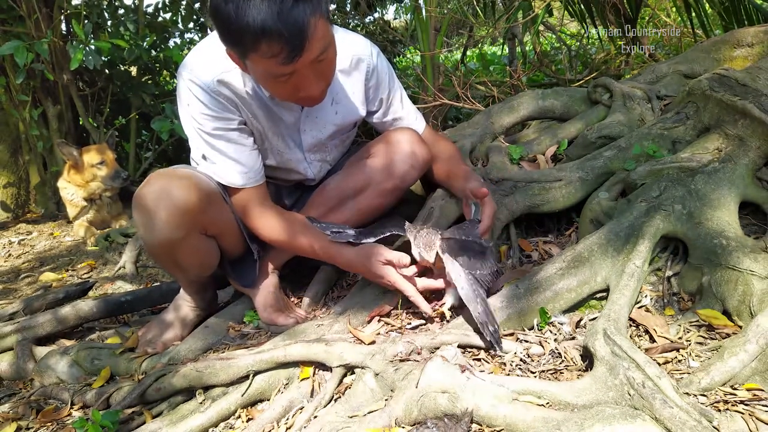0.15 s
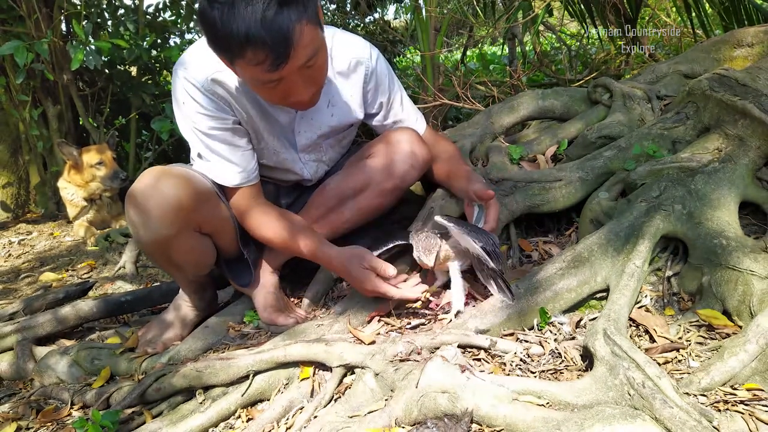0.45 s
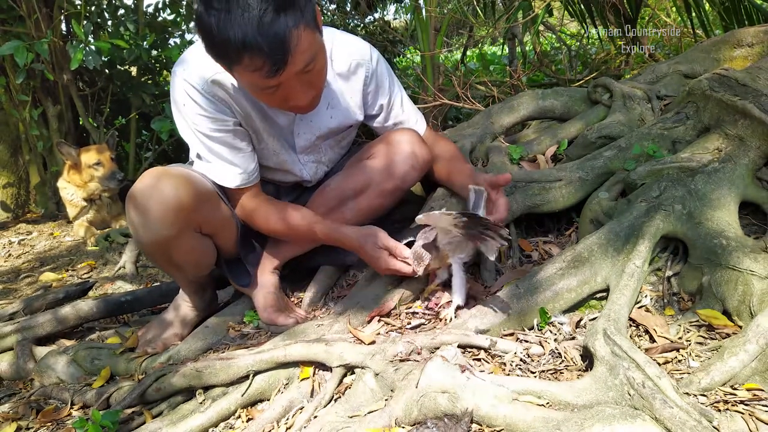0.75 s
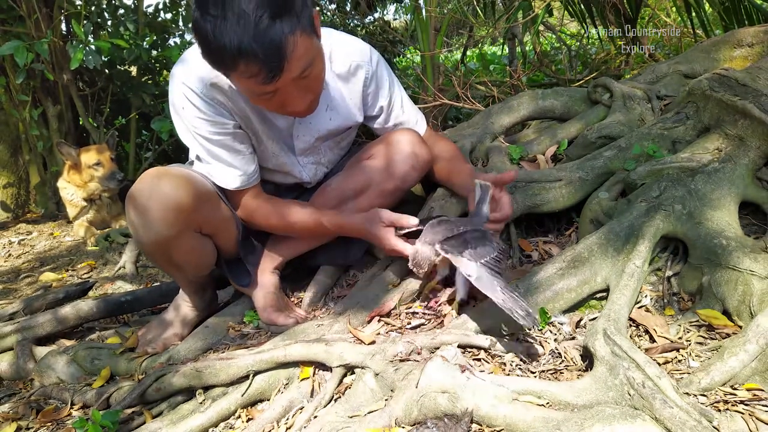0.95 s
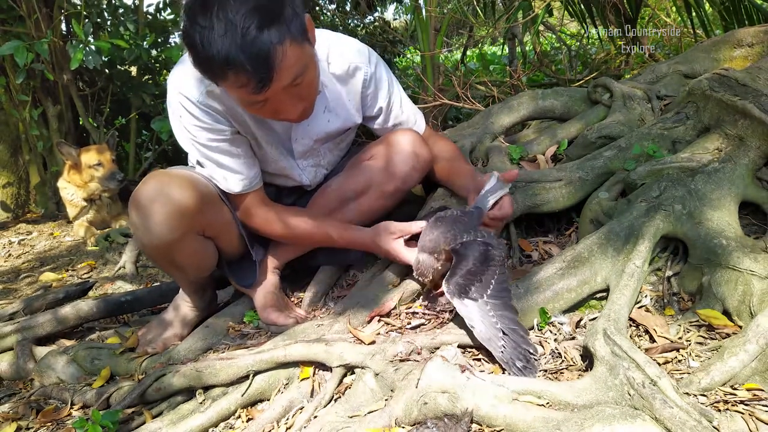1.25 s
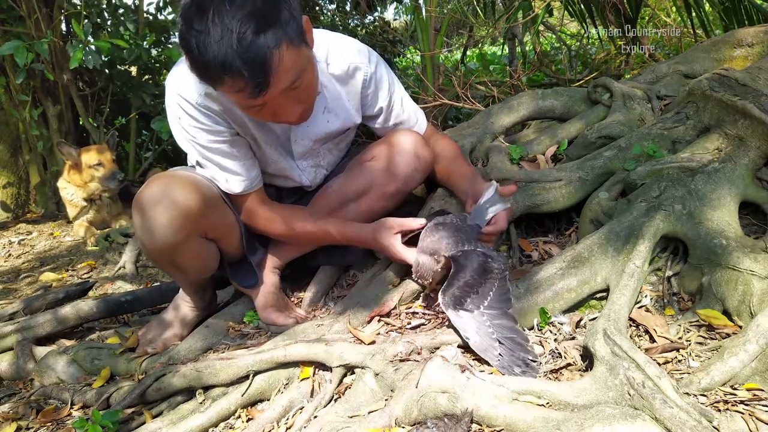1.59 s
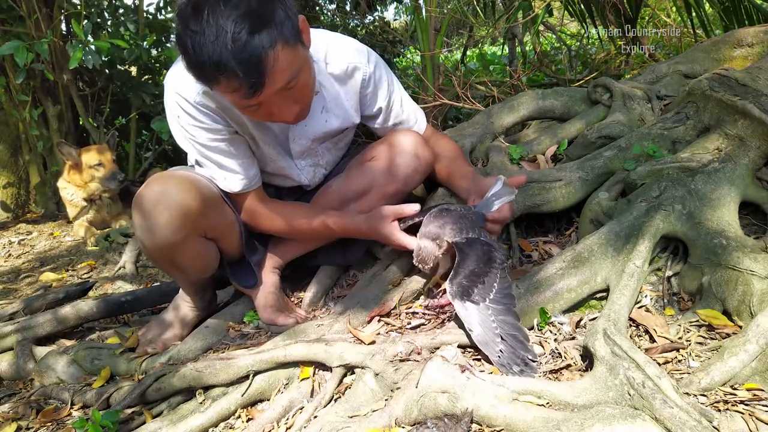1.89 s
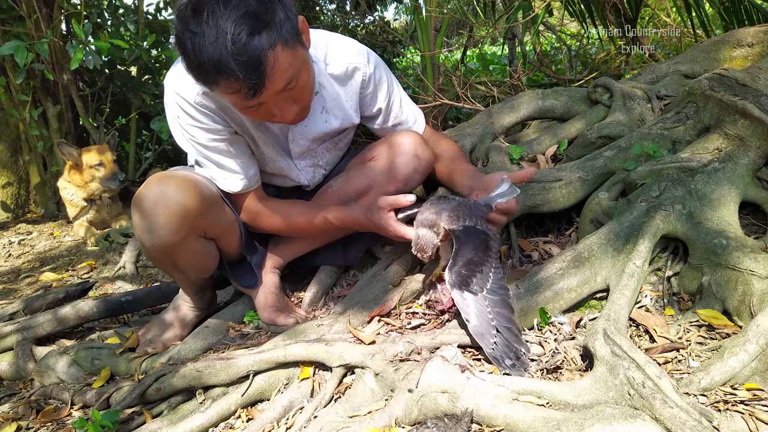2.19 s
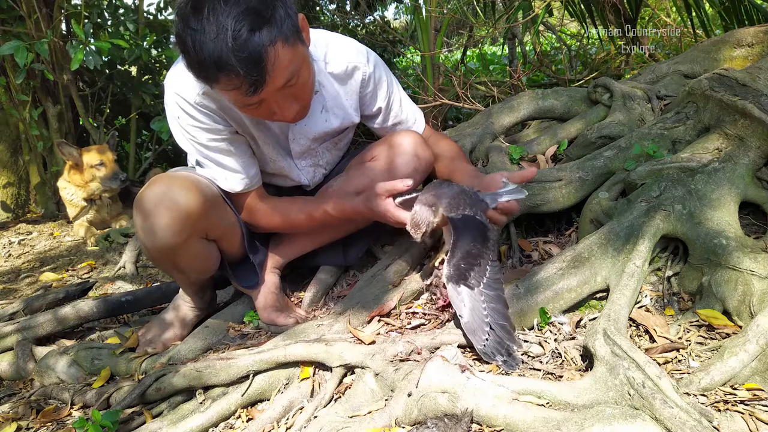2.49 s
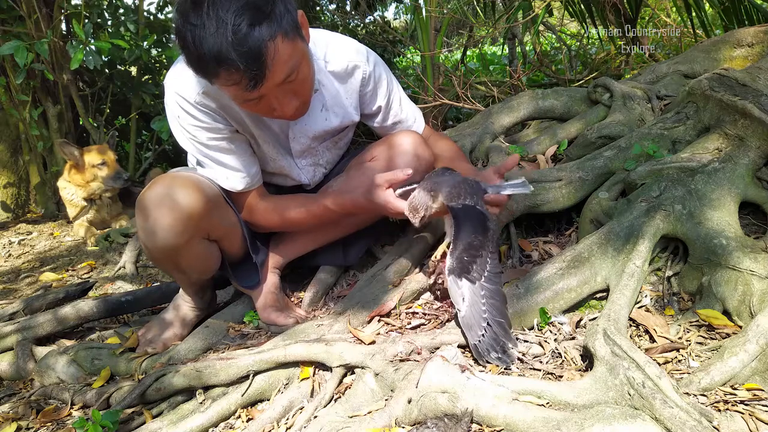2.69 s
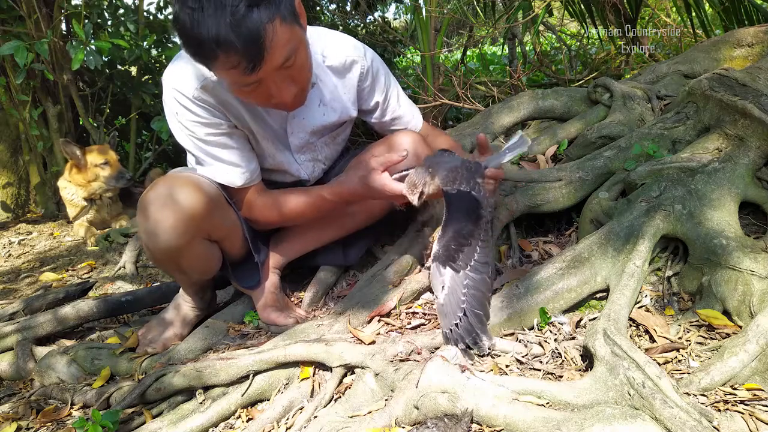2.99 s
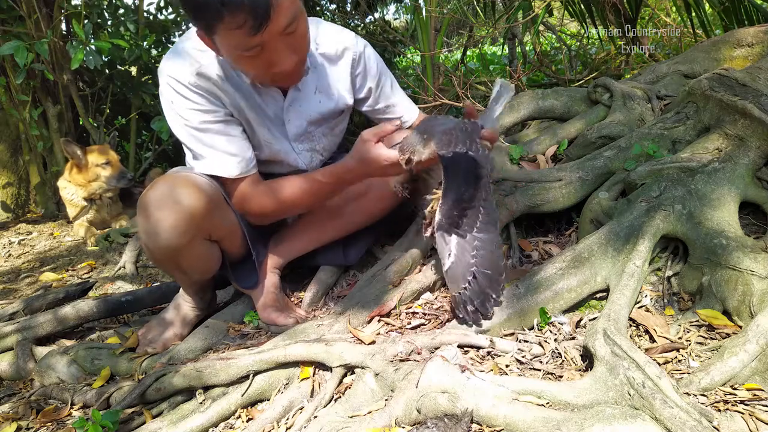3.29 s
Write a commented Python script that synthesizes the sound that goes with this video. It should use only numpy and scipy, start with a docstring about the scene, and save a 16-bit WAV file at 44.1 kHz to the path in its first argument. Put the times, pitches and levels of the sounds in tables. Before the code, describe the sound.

Young bird of prey gives two long, thin, hoarse whistled screeches outdoors, starting a third

```python
"""A young kite, held by hand under trees, gives two long begging screeches and starts a third.
The long ones open with a tiny croak, slide into thin whistles and hiss, and fall away in a creak.
Whistles are gliding sines, croaks and creaks harmonic sums; noise makes the hoarse tones and hiss.
Filtered noise also makes the wind and handling rumble, quiet air, faint rustles and a high sizzle.
Two distant drones are wavering narrow bands; a short diffuse echo surrounds the bird."""
import sys
import numpy as np
from scipy import signal
from scipy.fft import rfft, irfft, next_fast_len
from scipy.io import wavfile

SR = 44100
rng = np.random.default_rng(int(sys.argv[2]) if len(sys.argv) > 2 else 0)


def generate_wav(signal):
    """Clip the signal to [-1, 1] and save it as 16-bit WAV at the path in sys.argv[1]."""
    frames = np.transpose(np.atleast_2d(signal))
    scaled = np.clip(frames, -1, 1) * 32767
    pcm = np.round(scaled).astype(np.int16)
    wavfile.write(sys.argv[1], SR, pcm)


N = 152145  # samples
T = np.arange(N) / SR
CUTOFF_HZ = 15700


def from_db(db):
    """Level law: twenty decibels are a tenfold amplitude."""
    return 10 ** (np.asarray(db) / 20)


def rms_one(x):
    """Power normalisation: scale to unit mean square."""
    return x / np.sqrt(np.mean(np.abs(x) ** 2) + 1e-20)


def in_time(rows):
    """Linear interpolation: each column of a curve at every sample."""
    s, *columns = np.transpose(rows)
    return [np.interp(T, s, c) for c in columns]


def at_hz(points, hz):
    """Logarithmic frequency scale: read a spectrum between its points."""
    f, value = np.transpose(points)
    return np.interp(np.log(np.maximum(hz, 1)), np.log(f), value)


def gate(start, end, fade):
    """Amplitude envelope: up to one between two times, with edges sloping for fade seconds."""
    return np.clip(np.minimum(T - start, end - T) / fade, 0, 1)


def drift(rate):
    """Random modulation: white noise through a two-pole low-pass at rate Hz, with unit power."""
    r = np.exp(-2 * np.pi * rate / SR)
    white = rng.standard_normal(N + SR)
    settled = signal.lfilter([1], [1, -2 * r, r * r], white)[SR:]
    return rms_one(settled)


def noise(colour, width=None):
    """Spectral shaping: noise rolled off outside its colour; stereo if given side-to-mid levels."""
    size = next_fast_len(N)
    hz = np.fft.rfftfreq(size, 1 / SR)
    above, below = hz / colour[-1][0], colour[0][0] / (hz + 1)
    outside = np.maximum(np.maximum(above, below), 1)
    gain = from_db(at_hz(colour, hz)) / outside ** 6
    mid, side = rfft(rng.standard_normal((2, size))) * gain
    if width is not None:
        mid = mid + side * from_db(at_hz(width, hz)) * [[1], [-1]]
    return rms_one(irfft(mid, size)[..., :N])


def phase_of(hz):
    """Phase accumulation: the running integral of a pitch curve, in radians."""
    return 2 * np.pi * np.cumsum(hz) / SR


def narrow_band(hz, width):
    """Resonance stirred by noise: two random amplitudes in quadrature make a wavering tone."""
    phase = phase_of(hz)
    return drift(width / 2) * np.sin(phase) + drift(width / 2) * np.cos(phase)


# gliding whistles of the screeches; columns: time_s, pitch_hz, level_db
WHISTLES = [
    [(.22, 3027, -44), (.242, 3138, -35.5), (.305, 3202, -32), (.36, 3330, -36.5), (.42, 3390, -39.5),
     (.47, 3414, -42), (.525, 3468, -39), (.6, 3676, -36), (.616, 3530, -29), (.655, 3573, -28),
     (.7, 3723, -30), (.745, 3740, -32.5), (.83, 4110, -35), (.852, 4130, -38), (.882, 4380, -36),
     (.9, 4210, -40)],
    [(.89, 3950, -43), (.912, 3744, -32), (.944, 3612, -33), (.968, 3590, -49), (.99, 3580, -30),
     (1.025, 3740, -30), (1.04, 3760, -22.5), (1.095, 3718, -28), (1.116, 3660, -29), (1.14, 3730, -38),
     (1.18, 3910, -41.5), (1.2, 4034, -62)],
    [(1.18, 4220, -47), (1.226, 4400, -37), (1.26, 4400, -33.5), (1.325, 4415, -31), (1.35, 4286, -35.5),
     (1.364, 4400, -32), (1.378, 4273, -35.5), (1.412, 4020, -51)],
    [(1.888, 2990, -50), (1.91, 3066, -44), (1.945, 3145, -38.5), (1.985, 3260, -39.5), (2.03, 3292, -35),
     (2.08, 3455, -38), (2.11, 3487, -39), (2.145, 3378, -34), (2.195, 3490, -38), (2.22, 3650, -45),
     (2.275, 3800, -50)],
    [(2.72, 3900, -43), (2.758, 3764, -38.5), (2.778, 3664, -29.5), (2.794, 3595, -34), (2.806, 3523, -28),
     (2.812, 3460, -48), (2.824, 3570, -39), (2.83, 3450, -50)],
]
# second harmonic of each whistle, relative to its fundamental; column: level_db
OCTAVE_DB = [-57, -53, -48, -28, -37]
WHISTLE_JITTER, WHISTLE_FLUTTER_DB = 0.0035, 0.2  # rms pitch share, rms level


def whistles():
    """Nearly sinusoidal oscillation: a slightly unsteady tone with a faint second harmonic."""
    out = 0
    waver = WHISTLE_JITTER * drift(155)
    flutter = WHISTLE_FLUTTER_DB * drift(54)
    for rows, octave_db in zip(WHISTLES, OCTAVE_DB):
        hz, db = in_time(rows)
        phase = phase_of(hz * (1 + waver))
        tone = np.sin(phase) + from_db(octave_db) * np.sin(2 * phase)
        level = gate(rows[0][0], rows[-1][0], 0.0037) * from_db(db + flutter)
        out = out + level * tone
    return np.sqrt(2) * out  # levels are rms of the fundamental


# throat colour, weighting harmonics against each other; columns: frequency_hz, gain_db
THROAT = [(550, -2), (820, 1.5), (1150, 4), (1700, -1), (2500, 2), (3200, 0), (3900, -18.5), (4600, -8.5),
          (5700, -7), (7500, -45), (15000, -38)]


def buzz(hz, level, tilt_db, top_hz):
    """Source and filter: harmonics of the syrinx, coloured by the throat, held to an rms level."""
    on = level > 0
    k = np.arange(1, 15)[:, None]  # harmonic numbers
    partials = k * hz[on]
    gains = from_db(at_hz(THROAT, partials) + tilt_db * np.log2(k))
    gains = gains * (partials < CUTOFF_HZ) / (1 + (partials / top_hz) ** 8)
    pulses = (gains * np.sin(k * (phase_of(hz[on]) + np.pi))).sum(0)
    out = np.zeros(N)
    out[on] = pulses / np.sqrt((gains ** 2).sum(0) / 2)
    return out * level


# the call sliding into and out of a screech; columns: time_s, pitch_hz, level_db
CREAKS = [
    [(.139, 1384, -51), (.15, 1574, -42), (.155, 1583, -33.5), (.16, 1654, -35.5), (.165, 1728, -40.5),
     (.177, 1806, -43), (.185, 2200, -45.5), (.215, 2500, -49), (.28, 2900, -56)],
    [(1.378, 3563, -34), (1.388, 3320, -27.5), (1.396, 2867, -43), (1.401, 1890, -46.5),
     (1.408, 1520, -42.5), (1.416, 1157, -49), (1.421, 804, -39.5), (1.428, 650, -51)],
    [(1.861, 1790, -56), (1.88, 1863, -60), (1.885, 2490, -51), (1.896, 3020, -50)],
    [(2.812, 2710, -37), (2.818, 2255, -42), (2.826, 1286, -28), (2.834, 1047, -32), (2.837, 815, -37.5),
     (2.843, 790, -33.5), (2.848, 645, -38), (2.853, 602, -32.5), (2.858, 560, -46)],
    [(3.325, 1160, -30), (3.329, 1243, -42.5), (3.333, 1560, -38), (3.339, 1585, -42), (3.344, 1864, -38.5),
     (3.365, 2150, -44.5), (3.395, 2500, -43.5), (3.41, 2917, -41.5), (3.426, 2780, -46),
     (3.43, 2930, -32.5), (3.437, 2865, -52), (3.455, 2710, -27)],
]
# tone of each slide; columns: tilt_db_per_octave, top_edge_hz, rms_jitter_share
CREAK_TONE = [(2.5, 3500, 0.012), (-2, 6300, 0.015), (4, 3600, .04), (0.5, 17000, 0.013),
              (-4.5, 6400, 0.0223)]
CREAK_FLUTTER_DB = 2.25  # rms


def creaks():
    """Rapid random modulation: jitter and flutter roughen the slides at both ends of a screech."""
    out = 0
    waver = drift(285)
    flutter = CREAK_FLUTTER_DB * drift(440)
    for rows, (tilt_db, top_hz, jitter) in zip(CREAKS, CREAK_TONE):
        hz, db = in_time(rows)
        level = gate(rows[0][0], rows[-1][0], 0.0016) * from_db(db + flutter)
        out = out + buzz(hz * (1 + jitter * waver), level, tilt_db, top_hz)
    return out


# croaks as the bill opens; columns: start_s, length_s, pitch_hz, level_db, tilt_db_per_octave
CROAKS = [(0.1315, 0.0063, 592, -38.5, -1.5), (1.8402, 0.0078, 628, -41.5, -10),
          (3.3112, 0.0067, 576, -36.5, -1.5)]


def croaks():
    """Harmonic pulse train: a few cycles at steady pitch before each screech."""
    out = 0
    for s, length, hz, db, tilt_db in CROAKS:
        level = gate(s, s + length, 0.0015) * from_db(db)
        out = out + buzz(np.full(N, hz), level, tilt_db, top_hz=4500)
    return out


# hoarse side tones and airy overtones
# columns: start_s, end_s, start_pitch_hz, end_pitch_hz, level_db, width_hz
SIDE_TONES = [(0.148, 0.426, 1754, 1855, -55.5, 131), (0.134, 0.23, 3150, 3100, -49.5, 120),
              (.23, 0.431, 3126, 3274, -40, 90), (0.388, 0.615, 3080, 3193, -43, 70),
              (0.444, 0.638, 3530, 3770, -50, 200), (0.604, 0.903, 3200, 3000, -54.5, 100),
              (.78, 1.126, 2410, 2746, -49, 140), (1.101, 1.381, 2696, 2982, -45, 131),
              (1.261, 1.407, 3560, 3425, -39, 101), (2.074, 2.254, 4230, 4400, -57.5, 140),
              (2.268, 2.434, 4050, 4330, -44.5, 260), (2.287, 2.589, 3330, 3270, -45, 100),
              (2.356, 2.503, 2384, 2516, -49, 90), (2.374, 2.499, 4806, 4700, -45, 200.3),
              (2.54, 2.75, 2806, 2865, -47, 70), (2.55, 2.716, 3740, 3850, -45.5, 140),
              (2.639, 2.725, 4554, 4630, -38.5, 150), (2.618, 2.856, 6180, 6500, -57, 700),
              (2.768, 2.878, 1270, 1140, -51, 300), (3.313, 3.39, 3146, 3070, -48, 110),
              (3.341, 3.47, 1790, 1860, -51.5, 200), (0.463, .71, 10780, 10630, -59.5, 450),
              (.7, 1.062, 11400, 10740, -69, 600), (1.08, 1.418, 10600, 9840, -67, 600)]


def side_tones():
    """Noise-driven resonance: air stirs narrow bands that never settle into a clean whistle."""
    out = 0
    for start, end, start_hz, end_hz, db, width in SIDE_TONES:
        hz = np.interp(T, [start, end], [start_hz, end_hz])
        out = out + gate(start, end, 0.034) * from_db(db) * narrow_band(hz, width)
    return out


# screech hiss in three registers; columns: time_s, level_db
LOW_HISS = [(.13, -70), (.2, -48.5), (.55, -48.5), (.75, -51), (.95, -49), (1.2, -54), (1.39, -67),
            (1.45, -77), (1.88, -64), (1.96, -56.5), (2.1, -49.5), (2.45, -49.5), (2.8, -47.5), (2.85, -35),
            (2.87, -88)]
HIGH_HISS = [(.4, -66), (.5, -49.5), (.58, -48), (.68, -45), (.86, -41), (1, -42.5), (1.2, -39.5),
             (1.3, -48), (1.38, -42.5), (1.42, -45), (1.45, -60.5), (2.08, -69.5), (2.18, -56),
             (2.28, -49.5), (2.42, -41), (2.53, -41), (2.7, -40.5), (2.85, -38.5), (2.865, -63)]
TOP_HISS = [(.3, -80), (.48, -57), (.62, -53), (.74, -61.5), (.88, -60), (1.05, -62.5), (1.25, -58),
            (1.42, -61.5), (1.5, -92), (2.2, -73), (2.42, -61), (2.84, -57.5), (2.88, -70)]
# colours before and after SECOND_CALL_S; columns: frequency_hz, density_db_per_hz (relative)
LOW_COLOURS = [
    [(700, -30), (1150, -12), (1450, -9), (1780, 0), (2050, -0.5), (2500, 1.5), (2900, -5), (3400, -6.5)],
    [(700, -42), (1200, -20.5), (1800, -21), (2050, -10), (2350, -3), (2900, -7.5), (3400, -6)],
]
HIGH_COLOURS = [
    [(2500, -1.5), (3100, -2), (3700, 1), (4200, 1.5), (4700, -2.5), (5050, -16.5), (5700, -17.5),
     (6200, -28), (8000, -49)],
    [(2500, -8), (3100, 2), (3600, 2), (4250, 2.5), (4800, 4), (5200, -10), (5700, -5), (6100, -27),
     (6900, -23), (8000, -39)],
]
TOP_COLOURS = [
    [(7000, -31), (8500, -12), (10100, -6.5), (10750, -2), (11500, -9), (12300, -11.5), (15500, -14)],
    [(7000, -20), (8800, 1), (9700, 3.5), (11000, -3), (15500, -10)],
]
SECOND_CALL_S, HISS_FLUTTER_DB = 1.7, -0.8


def hiss():
    """Turbulence: air rushing through the open bill, coloured differently in each long screech."""
    registers = ((LOW_HISS, LOW_COLOURS), (HIGH_HISS, HIGH_COLOURS), (TOP_HISS, TOP_COLOURS))
    # columns: frequency_hz, side_minus_mid_db
    first_width = [(2000, -9), (4500, -8), (10000, -2.5)]
    second_width = [(2000, -15.5), (4500, -5), (10000, -1)]
    out = 0
    for curve, (first, second) in registers:
        first_noise, second_noise = noise(first, first_width), noise(second, second_width)
        breath = np.where(T < SECOND_CALL_S, first_noise, second_noise)
        out = out + from_db(in_time(curve)[0]) * breath
    return out * from_db(HISS_FLUTTER_DB * drift(120))


# the balance of the voice between the ears swings, sometimes sharply; columns: time_s, left_minus_right_db
BIRD_PAN = [(0.25, -1.0), (0.58, 1.5), (0.63, -4.5), (0.85, 1), (0.95, 10.0), (0.99, -6.5), (1.06, 7),
            (1.14, 0), (1.15, 13), (1.29, -1.5), (1.49, 4.5), (1.9, -1), (1.92, 3.5), (2.21, 1), (2.25, -9),
            (2.74, 0.0), (3.36, 1), (3.4, 1.5)]
EAR_LAG_S = .00002


def place_voice(voice):
    """Interaural differences: a moving level difference and a fixed delay on the right."""
    ears = np.array([voice, np.interp(T - EAR_LAG_S, T, voice)])
    return ears * from_db(in_time(BIRD_PAN)[0] * [[.5], [-.5]])


ECHO_DB, ECHO_T60_S = -11, 0.18


def scatter(x):
    """Diffuse reflection: roots and trunks return a short decaying tail, different on each side."""
    t = T[:SR // 3]
    tail = rng.standard_normal((2, len(t))) * from_db(-60 * t / ECHO_T60_S) * (t > .004)
    tail /= np.sqrt((tail ** 2).sum(1, keepdims=True))
    return from_db(ECHO_DB) * signal.fftconvolve(x, tail, axes=1)[:, :N]


# wind and handling level; columns: time_s, level_db
RUMBLE = [(0.0, -46), (1.09, -45.5), (1.24, -32), (1.47, -40), (1.5, -34.5), (1.74, -46), (2.02, -50),
          (2.04, -33.5), (2.1, -62), (2.33, -33.5), (2.45, -52), (2.48, -38), (2.56, -48), (2.62, -27.5),
          (2.66, -42), (3.18, -46), (3.3, -36), (3.45, -42)]
# its spectrum; columns: frequency_hz, density_db_per_hz (relative)
RUMBLE_COLOUR = [(15, -6), (28, -8.5), (42, 0.5), (65, 1), (100, -5), (150, -13.5), (250, -43.5),
                 (500, -58)]


def rumble():
    """Low-frequency pressure fluctuation: wind and handling swell on the microphone."""
    return from_db(in_time(RUMBLE)[0]) * noise(RUMBLE_COLOUR, [(40, -50), (200, -6)])


# outdoor background spectrum; columns: frequency_hz, density_db_per_hz (relative)
AIR = [(30, -21), (80, -0.5), (130, 0), (170, -2.5), (210, -4), (260, -13), (340, -17.5), (500, -19),
       (660, -20.5), (850, -24), (1200, -25), (2100, -33), (3300, -29.5), (6300, -30.5), (8100, -30),
       (11000, -35), (15500, -41.5)]
# its stereo spread, shared by rustles and sizzle; columns: frequency_hz, side_minus_mid_db
AIR_WIDTH = [(50, -20), (130, -18), (300, -6.5), (700, 1.5), (2000, -0.5), (10000, -1.5)]
AIR_DB = -47.5


def air():
    """Stationary noise: the steady, quiet sound of the open air."""
    return from_db(AIR_DB) * noise(AIR, AIR_WIDTH)


# feathers and leaves; columns: centre_s, length_s, level_db
RUSTLES = [(0.398, 0.06, -58.5), (0.855, 0.07, -53.5), (1.72, 0.21, -64.5), (3.101, 0.1, -54.5),
           (3.326, 0.099, -57)]
# their spectrum; columns: frequency_hz, density_db_per_hz (relative)
RUSTLE_COLOUR = [(1500, -8), (4000, -11), (6500, -4), (8000, 5), (10000, -6), (15000, -7)]


def rustles():
    """Granular friction noise: short Gaussian swells of feathers and dry leaves."""
    level = sum(from_db(db) * np.exp(-2 * ((T - s) / length) ** 2) for s, length, db in RUSTLES)
    grains = noise(RUSTLE_COLOUR, AIR_WIDTH) * from_db(3.1 * drift(200))
    return level * rms_one(grains)


# faint distant drones; columns: time_s, pitch_hz, level_db (of the part common to both sides)
DRONES = [
    [(0, 208.1, -62.5), (.4, 211, -54), (1.1, 200, -55.5), (1.35, 208, -51), (1.8, 209.9, -56),
     (2.3, 215, -55), (2.52, 212, -44), (2.8, 202.8, -52), (3.1, 205, -61), (3.45, 207.7, -60)],
    [(0, 692, -67), (.3, 660, -65.5), (1, 649.4, -61), (1.7, 650, -69), (2, 580, -65), (2.17, 568, -61.5),
     (2.5, 600, -82), (2.95, 685, -63.5), (3.45, 733, -60)],
]
# bandwidth of each drone; column: width_hz
DRONE_WIDTHS_HZ = [21, 68]


def drones():
    """Partial coherence: two wavering narrow bands far away, partly different on each side."""
    out = 0
    for curve, width in zip(DRONES, DRONE_WIDTHS_HZ):
        hz, db = in_time(curve)
        common = narrow_band(hz, width)
        difference = from_db(-11.5) * narrow_band(hz, width) * [[1], [-1]]
        out = out + from_db(db) * (common + difference)
    return out


# repeated faint, very high swells, probably an insect; columns: centre_s, level_db
SIZZLES = [(.62, -67), (1.3, -63), (1.89, -59), (2.58, -62), (3.35, -65)]
# their spectrum; columns: frequency_hz, density_db_per_hz (relative)
SIZZLE_COLOUR = [(9500, -10), (12500, -7), (14500, 0), (15700, -7)]
SIZZLE_LENGTH_S = 0.26


def sizzle():
    """Amplitude-modulated noise: soft Gaussian swells of very high hiss from the undergrowth."""
    level = sum(from_db(db) * np.exp(-2 * ((T - s) / SIZZLE_LENGTH_S) ** 2) for s, db in SIZZLES)
    return level * noise(SIZZLE_COLOUR, AIR_WIDTH)


def scene():
    """Superposition: the bird close by and its echo, over rumble and quiet outdoor air."""
    voice = whistles() + creaks() + croaks() + side_tones()
    bird = place_voice(voice) + hiss()
    return bird + scatter(bird) + rumble() + air() + rustles() + drones() + sizzle()


def record(dry):
    """Elliptic low-pass filtering: the top is cut steeply."""
    top_cut = signal.ellip(12, .1, 80, CUTOFF_HZ, fs=SR, output="sos")  # ripple and stopband in dB
    return signal.sosfilt(top_cut, dry)


dry = scene()
out = record(dry)
generate_wav(out)
```